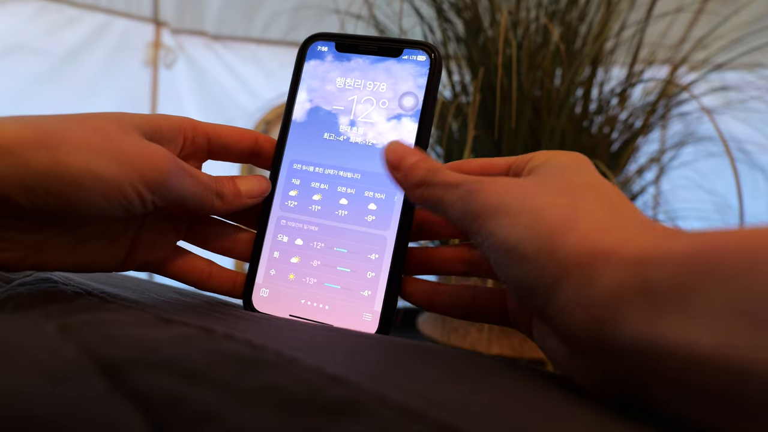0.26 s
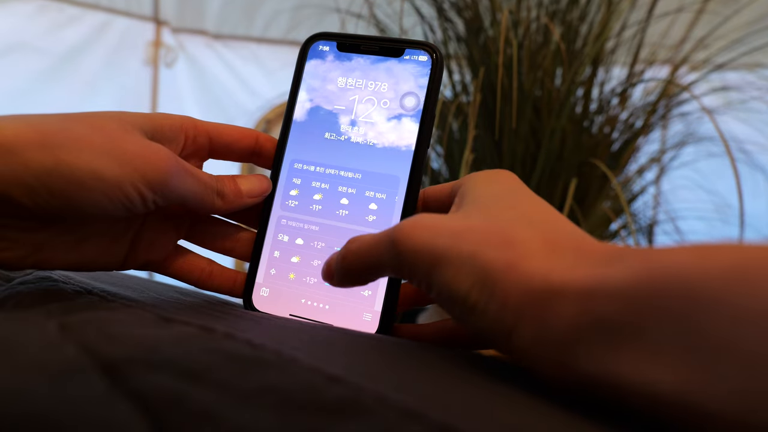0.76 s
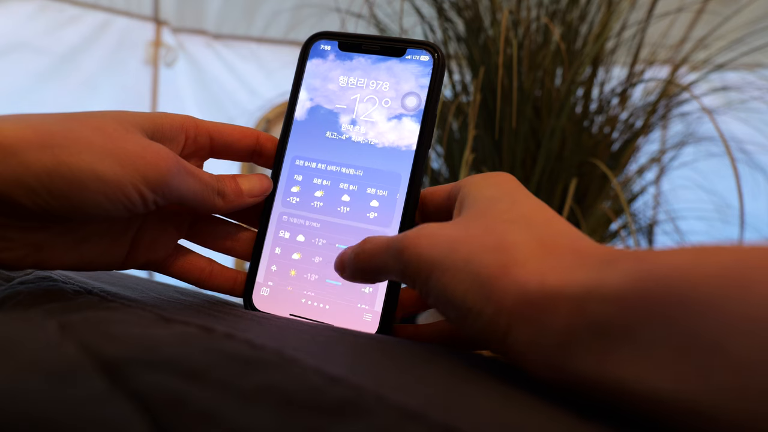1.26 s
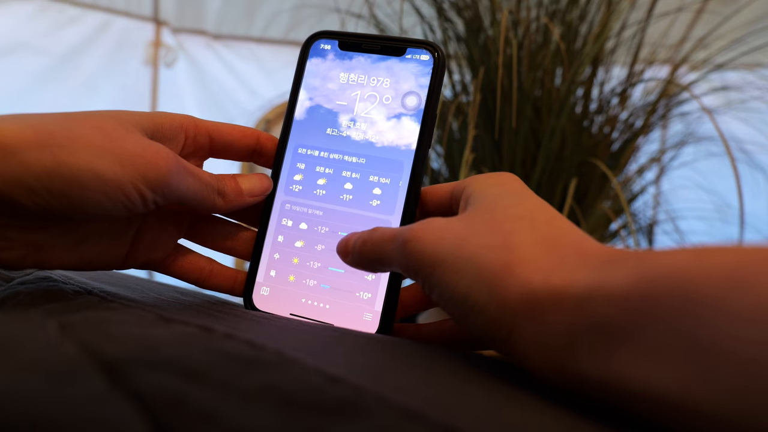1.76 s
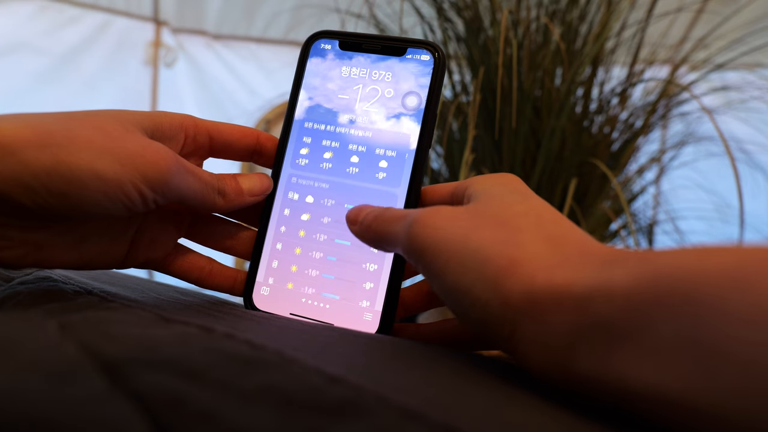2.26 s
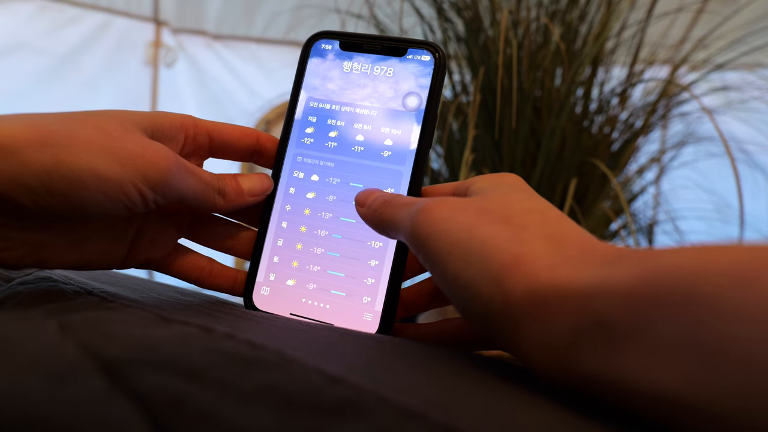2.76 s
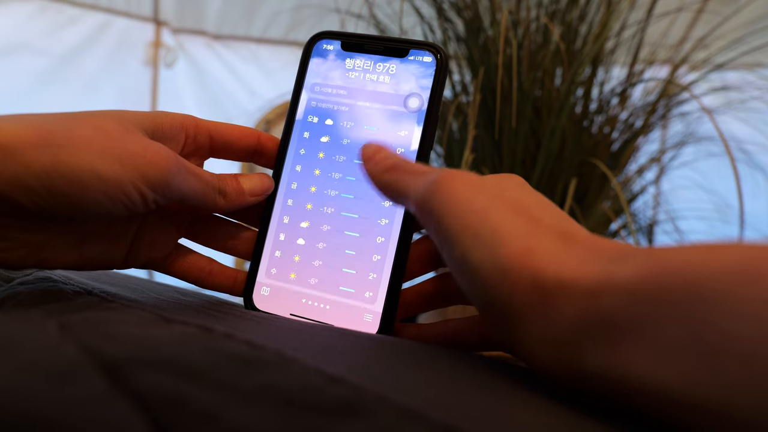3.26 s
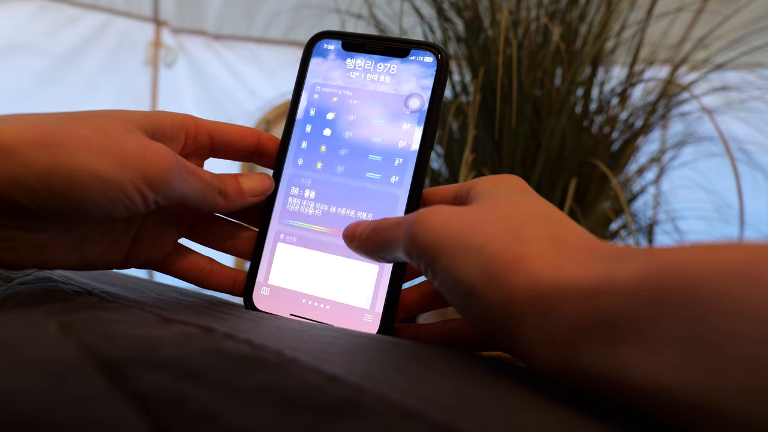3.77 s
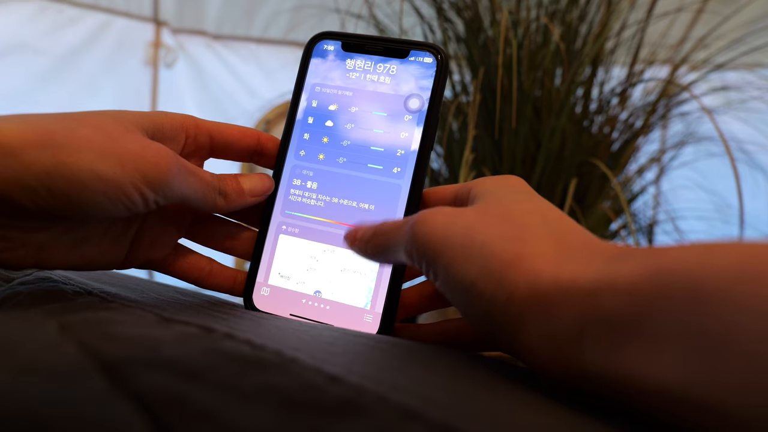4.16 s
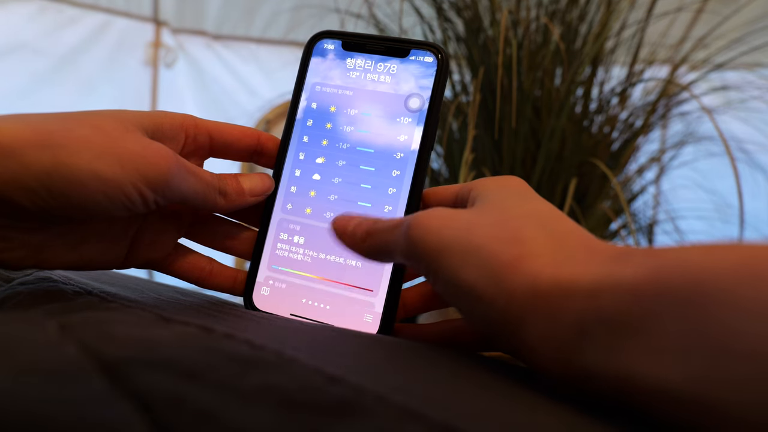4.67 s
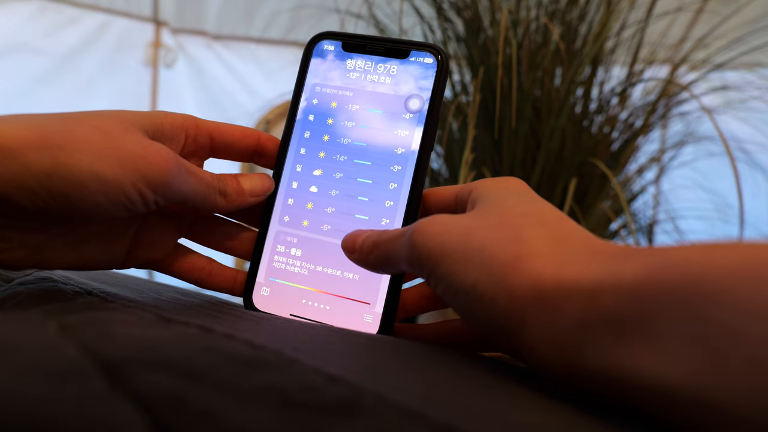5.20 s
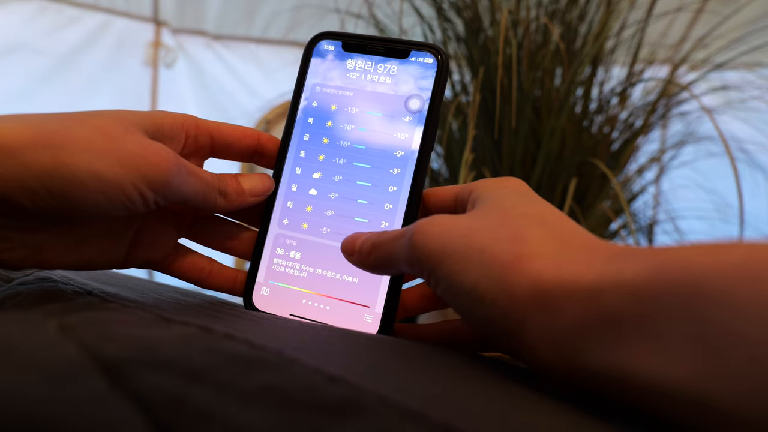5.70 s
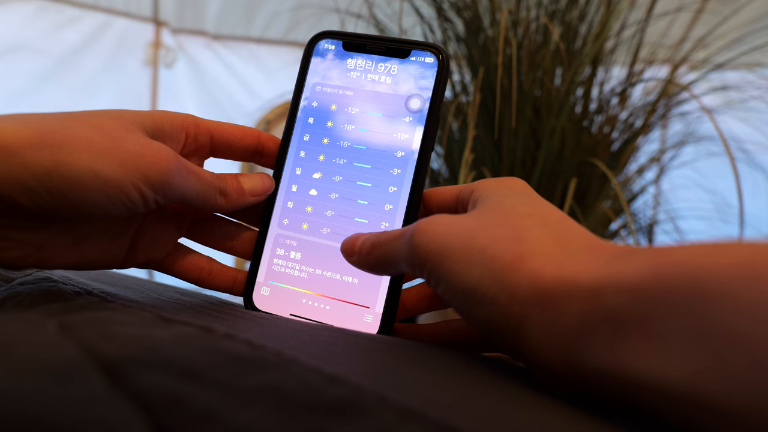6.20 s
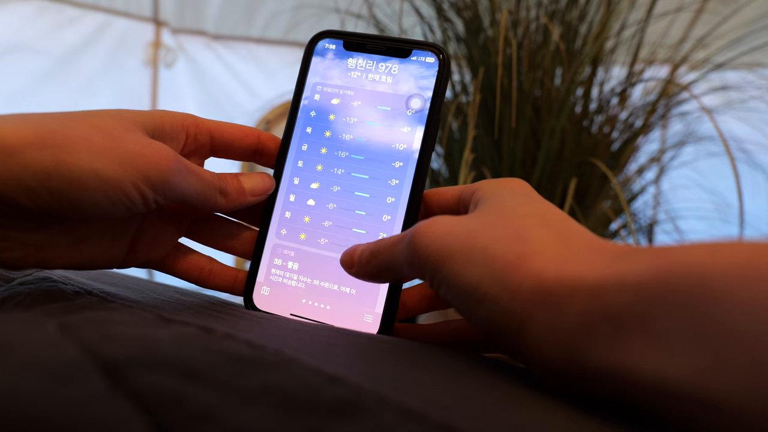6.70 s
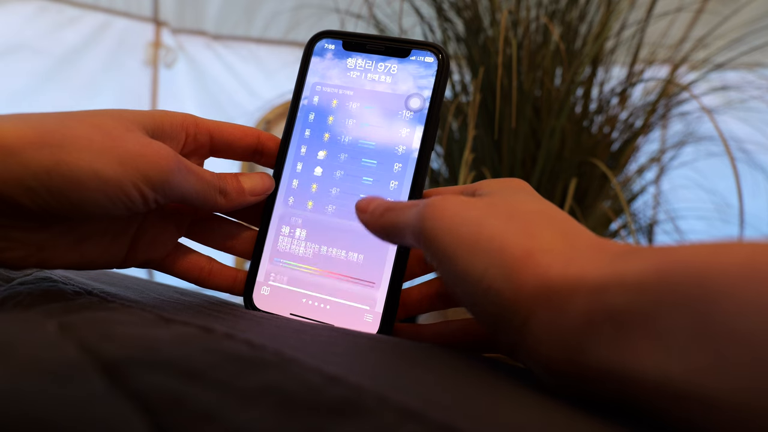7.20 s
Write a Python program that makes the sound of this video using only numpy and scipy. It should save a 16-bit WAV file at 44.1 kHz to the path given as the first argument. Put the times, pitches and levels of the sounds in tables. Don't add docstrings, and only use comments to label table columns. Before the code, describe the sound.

Inside a tent, a small electric fan heater hums continuously at low level, straight ahead of a stereo microphone. The deep motor tone beats evenly about three times a second, with a soft mains buzz, dull rushing air and faint microphone hiss. One tiny tick comes at the very start and a sharper one near the end. Fingers scrolling on a phone make no distinct sound.

```python
import sys
import numpy as np
from scipy import signal
from scipy.fft import rfft, irfft, next_fast_len
from scipy.io import wavfile

SR = 44100
rng = np.random.default_rng(int(sys.argv[2]) if len(sys.argv) > 2 else 0)


def wav_out(sig):
    wavfile.write(sys.argv[1], SR, np.round(np.clip(np.atleast_2d(sig).T, -1, 1) * 32767).astype(np.int16))


def linear_from_db(decibels):
    return 10 ** (np.asarray(decibels, float) / 20)


N = 328545

MOTOR_HZ, ROTOR_HZ, FIELD_HZ = 77.757, 40.36, 119.99
IN_STEP_S = -0.036
EDGE_HZ, EDGE_FLUTTER_DB, EDGE_FLUTTER_HZ = 1665, 1.5, 5.6
PUFF_SWELL_S, PUFF_FADE_S = 0.0098, 0.028

# pitch_hz [Hz], level_db [dB per Hz]
HISS_COMMON = [(1000, -112), (2500, -112.5), (4000, -113.7), (8000, -115.3), (15000, -116.5), (15800, -120)]
# pitch_hz [Hz], level_db [dB per Hz]
HISS_OPPOSITE = [(40, -115), (90, -113), (130, -116), (300, -115), (600, -112), (1300, -115.5),
                 (3000, -116.5), (8000, -118.5), (15500, -119)]
# pitch_hz [Hz], level_db [dB per Hz]
AIR_SPECTRUM = [(22, -107), (40, -92), (58, -84), (90, -84.5), (180, -80.5), (245, -82.5), (290, -81.5),
                (335, -84), (520, -93), (610, -90), (740, -93), (1400, -98.5), (2000, -111), (4500, -135)]
# peak_s [s], rise_db [dB]
AIR_PUFFS = [
    (.92, 7),
    (1.08, 5),
    (1.49, 6),
    (2.21, 7),
    (3.93, 5),
    (6.91, 7),
]
# start_s [s], level_db [peak dB], pitch_hz [Hz], t60_s [s]
TICK_EVENTS = [
    (.0269, -51, 2700, 0.0089),
    (.0316, -60, 2620, .009),
    (.0362, -59, 2800, .006),
    (6.7797, -52, 15300, .0015),
    (6.7797, -64, 11500, .001),
]
# pitch_hz [Hz], width_hz [Hz], level_db [rms dB]
HOUSING_MODES = [(300.8, 1.4, -70.5), (416, 3, -80.5), (1437.5, 1.5, -81), (2406.5, 3, -96),
                 (5272, .4, -100)]
# field_multiple [-], motor_multiple [-], level_db [rms dB]
FIELD_TONES = [(1, 0, -63), (3, 0, -66), (4, 0, -82.5), (1, 1, -69), (1, 2, -73.5), (1, 3, -74),
               (1, 4, -74), (1, 5, -86), (1, 7, -90), (2, -1, -68), (2, 1, -72.5), (2, 2, -73.5),
               (2, 3, -85), (2, 5, -90), (2, 6, -77.5), (3, 4, -80.5), (4, 2, -84.5), (4, 3, -80.5),
               (-1, 4, -74.5), (-1, 6, -74.5), (-2, 9, -77)]
# rotor_multiple [-], level_db [rms dB]
ROTOR_TONES = [(1, -77), (2, -63), (3, -86.5), (4, -84), (7, -80), (8, -75.5)]
# motor_multiple [-], level_db [rms dB]
MOTOR_TONES = [(1, -62), (2, -52.1), (3, -64.2), (4, -59.3), (5, -80), (6, -63.5), (7, -75.5), (8, -77.5),
               (9, -69.3), (10, -81), (11, -72.2), (12, -85), (13, -74), (14, -80.6), (15, -78.7),
               (16, -80.6), (17, -70), (18, -80.3), (19, -75), (20, -90), (21, -83), (22, -94), (24, -94),
               (27, -100), (33, -102), (45, -101), (47, -101), (51, -101)]


def drift(rate_hz):
    step = 200
    r = np.exp(-2 * np.pi * rate_hz * step / SR)
    coarse = rng.standard_normal(N // step + 1002)
    slow = signal.lfilter([1], [1, -2 * r, r * r], coarse)[1000:]
    slow = (slow - slow.mean()) / slow.std()
    return np.interp(np.arange(N) / step, np.arange(len(slow)), slow)


def coloured(spectrum):
    size = next_fast_len(N)
    hz = np.maximum(np.fft.rfftfreq(size, 1 / SR), 1)
    pitch_hz, level_db = np.transpose(spectrum)
    density_db = np.interp(np.log(hz), np.log(pitch_hz), level_db)
    gain = linear_from_db(density_db) * np.sqrt(SR / 2)
    return irfft(rfft(rng.standard_normal(size)) * gain, size)[:N]


def microphone_hiss():
    return coloured(HISS_COMMON) + coloured(HISS_OPPOSITE) * np.array([[1], [-1]])


def rushing_air():
    rush = coloured(AIR_SPECTRUM)
    dull = signal.sosfilt(signal.butter(4, EDGE_HZ, "low", fs=SR, output="sos"), rush)
    bright = signal.sosfilt(signal.butter(4, EDGE_HZ, "high", fs=SR, output="sos"), rush)
    t = np.arange(N) / SR
    bright_db = EDGE_FLUTTER_DB * drift(EDGE_FLUTTER_HZ)
    for peak_s, rise_db in AIR_PUFFS:
        time_constant_s = np.where(t < peak_s, PUFF_SWELL_S, PUFF_FADE_S)
        bright_db += rise_db * np.exp(-np.abs(t - peak_s) / time_constant_s)
    gust_db = 0.25 * drift(0.58)
    return dull * linear_from_db(gust_db) + bright * linear_from_db(bright_db)


def ticks():
    out = np.zeros(N)
    t = np.arange(SR // 20) / SR
    for start_s, level_db, pitch_hz, t60_s in TICK_EVENTS:
        swell = (1 - np.exp(-t * pitch_hz / 1.2)) ** 2
        decay = linear_from_db(level_db - 60 * t / t60_s)
        ring = 2.0 * swell * decay * np.sin(2 * np.pi * pitch_hz * t)
        out[round(start_s * SR):][:len(t)] += ring
    return out


def housing_whistles():
    out = np.zeros(N)
    for pitch_hz, width_hz, level_db in HOUSING_MODES:
        r = np.exp(-np.pi * width_hz / SR)
        poles = [1, -2 * r * np.cos(2 * np.pi * pitch_hz / SR), r * r]
        narrow = signal.lfilter([1, 0, -1], poles, rng.standard_normal(N + SR))[SR:]
        out += linear_from_db(level_db) * narrow / narrow.std()
    return out


def angle(rate_hz, unsteady_rad):
    wander = drift(0.31) + 0.3 * drift(0.85)
    return 2 * np.pi * rate_hz * (np.arange(N) / SR - IN_STEP_S) + unsteady_rad * wander


def tone(phase, level_db, waver):
    return np.sqrt(2) * linear_from_db(level_db) * (1 + waver * drift(0.67)) * np.sin(phase)


def field_buzz(motor):
    field = angle(FIELD_HZ, 0.083)
    out = np.zeros(N)
    for field_multiple, motor_multiple, level_db in FIELD_TONES:
        start = rng.uniform(0, 2 * np.pi)
        out += tone(field_multiple * field + motor_multiple * motor + start, level_db, waver=0.077)
    return out


def second_rotor():
    rotor = angle(ROTOR_HZ, 0.047)
    return sum(tone(multiple * rotor, level_db, waver=0.079) for multiple, level_db in ROTOR_TONES)


def motor_hum(motor):
    out = np.zeros(N)
    for multiple, level_db in MOTOR_TONES:
        scatter_rad = rng.normal(0, 0.12) if multiple > 4 else 0
        out += tone(multiple * (motor + scatter_rad), level_db, waver=0.004 * multiple)
    return out


def heater():
    motor = angle(MOTOR_HZ, 0.014)
    return field_buzz(motor) + second_rotor() + motor_hum(motor)


def scene():
    mono = rushing_air() + ticks() + housing_whistles() + heater()
    return np.tile(mono, (2, 1))


def roll_off(x):
    return signal.sosfilt(signal.butter(12, 15720, fs=SR, output="sos"), x)


def record(dry):
    return roll_off(dry + microphone_hiss())


dry = scene()
out = record(dry)
wav_out(out)
```